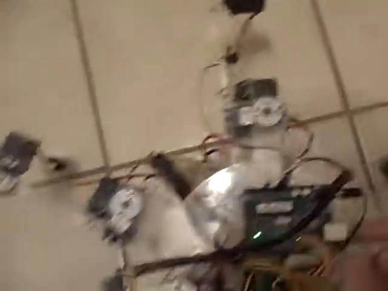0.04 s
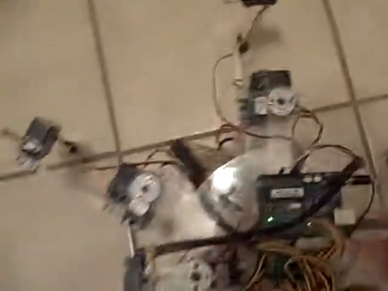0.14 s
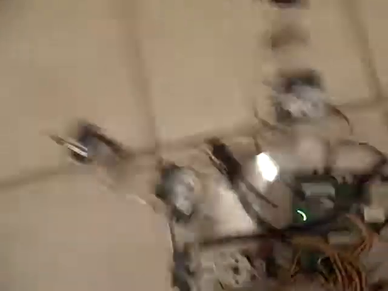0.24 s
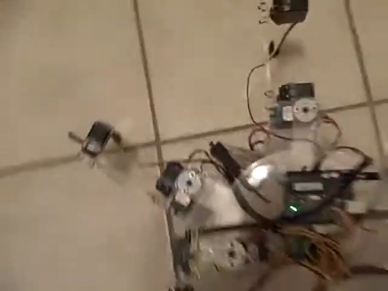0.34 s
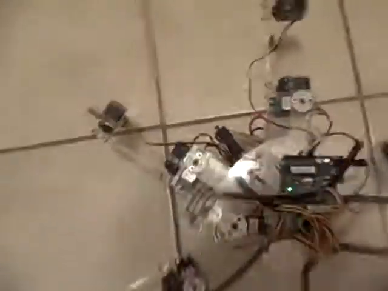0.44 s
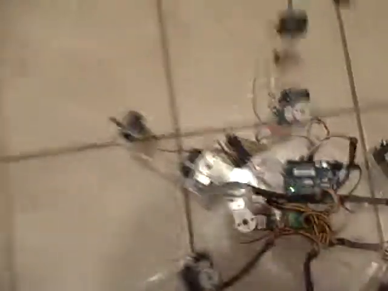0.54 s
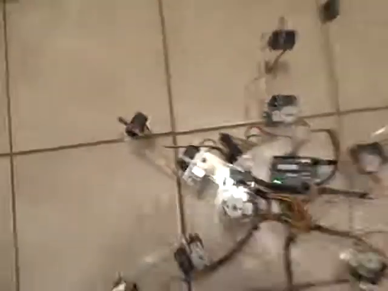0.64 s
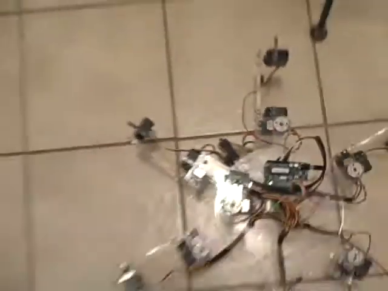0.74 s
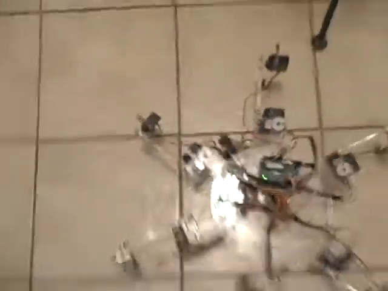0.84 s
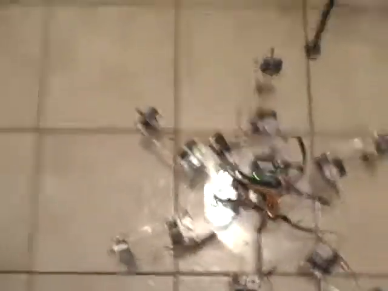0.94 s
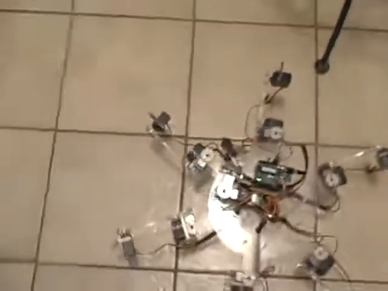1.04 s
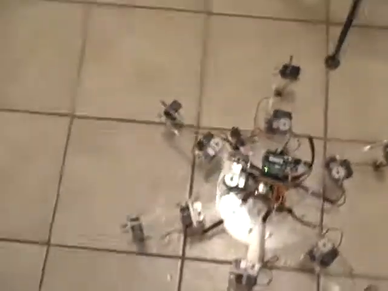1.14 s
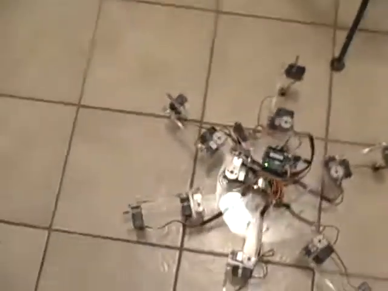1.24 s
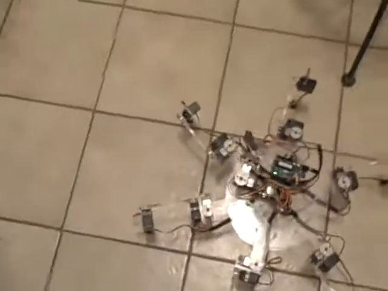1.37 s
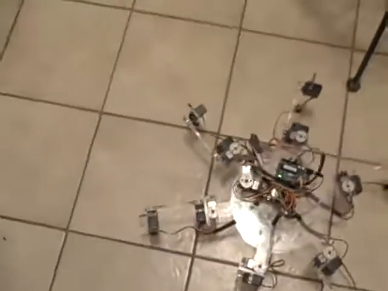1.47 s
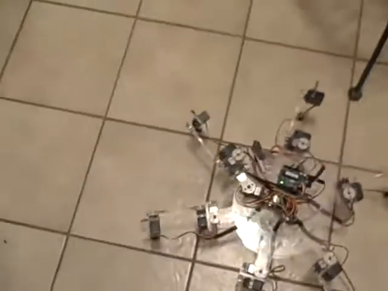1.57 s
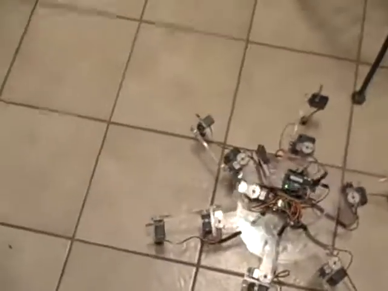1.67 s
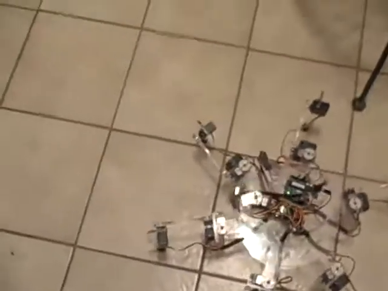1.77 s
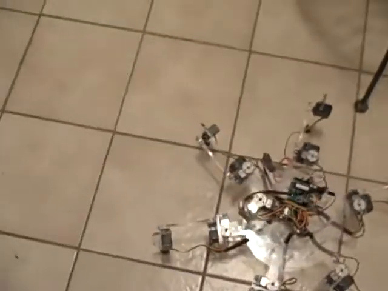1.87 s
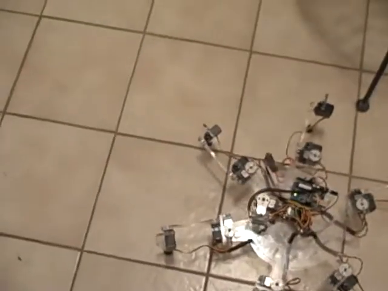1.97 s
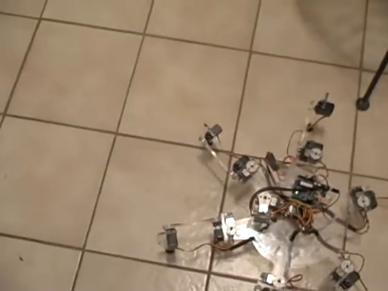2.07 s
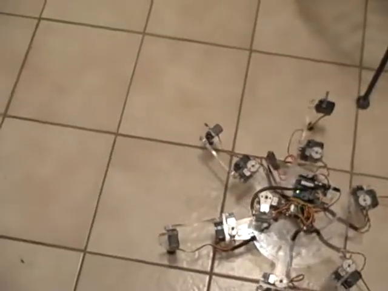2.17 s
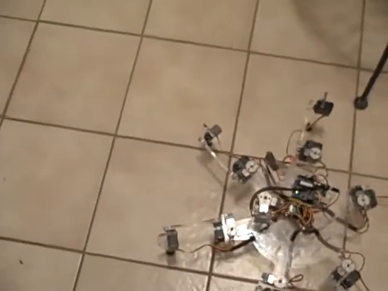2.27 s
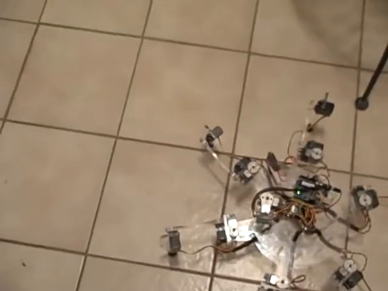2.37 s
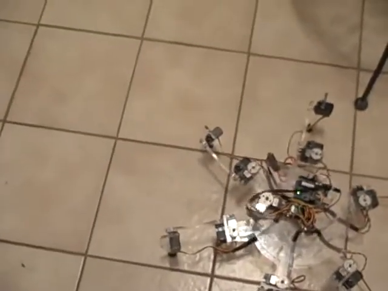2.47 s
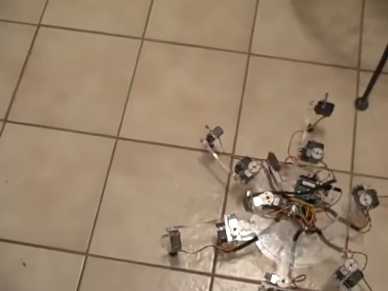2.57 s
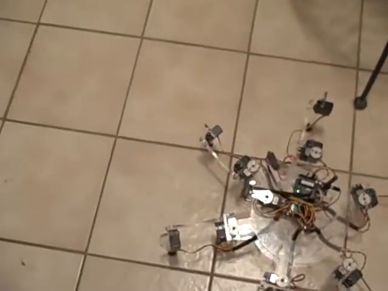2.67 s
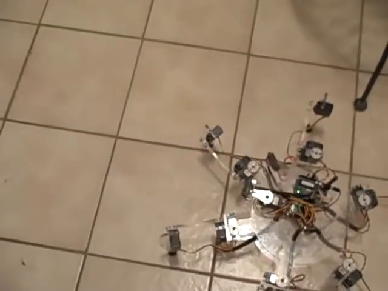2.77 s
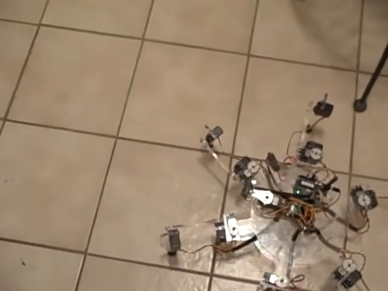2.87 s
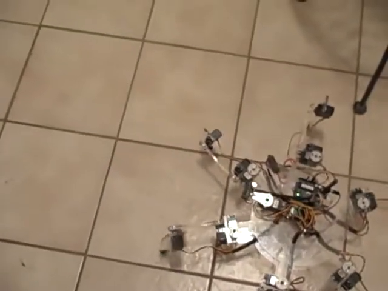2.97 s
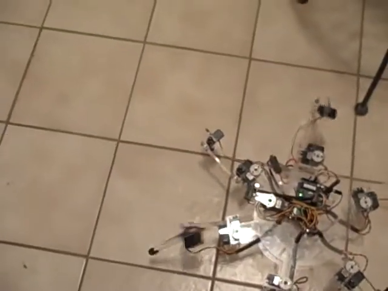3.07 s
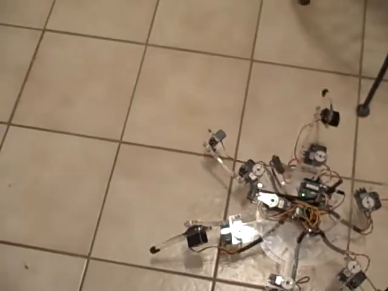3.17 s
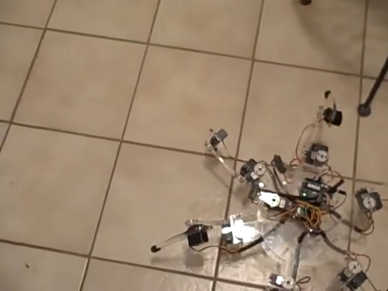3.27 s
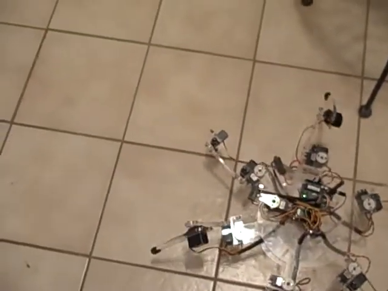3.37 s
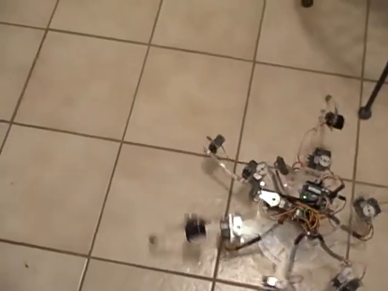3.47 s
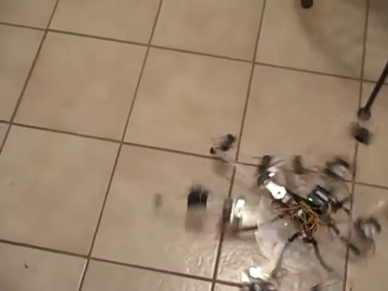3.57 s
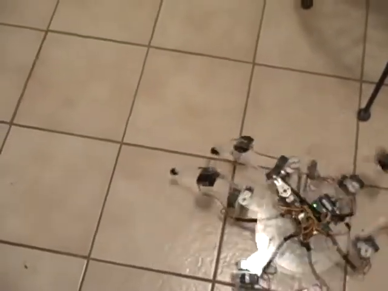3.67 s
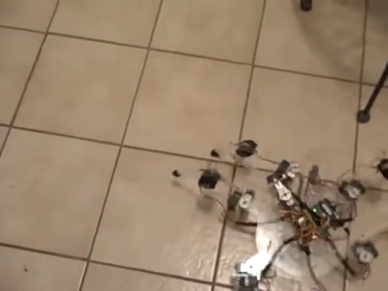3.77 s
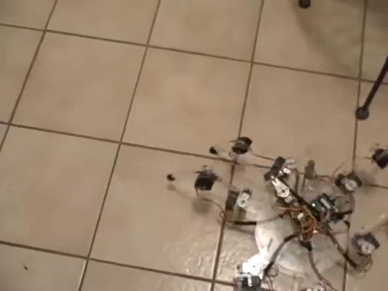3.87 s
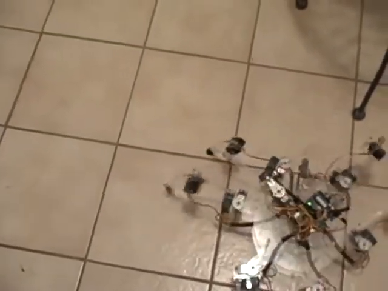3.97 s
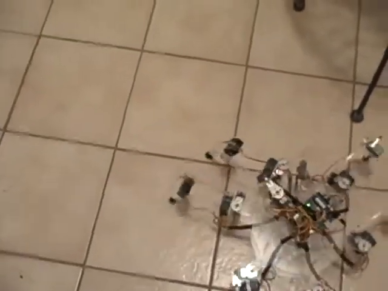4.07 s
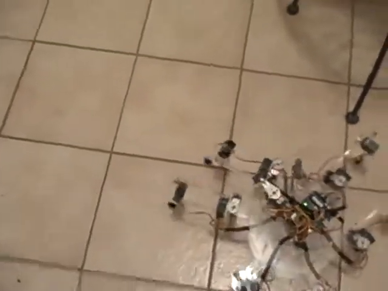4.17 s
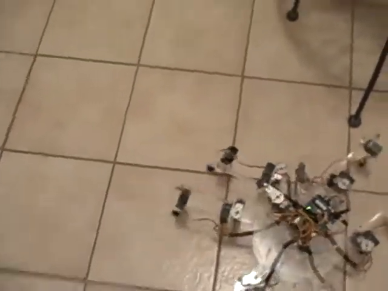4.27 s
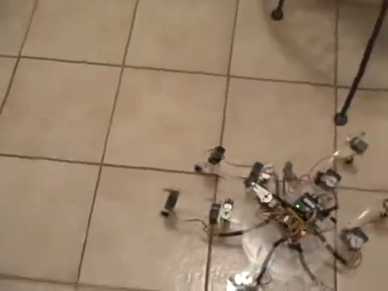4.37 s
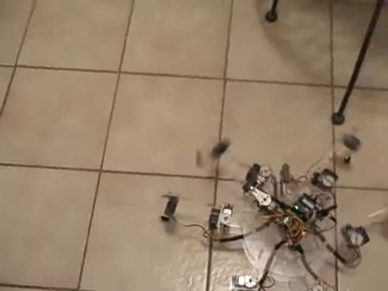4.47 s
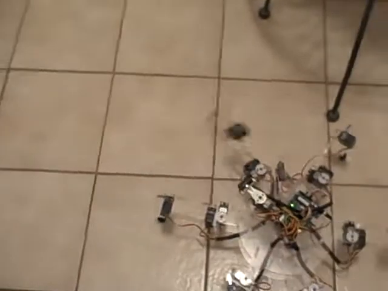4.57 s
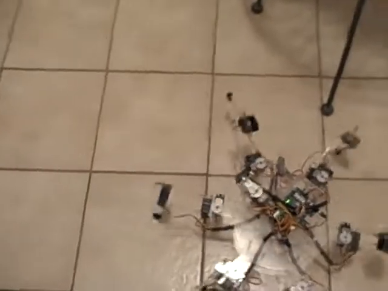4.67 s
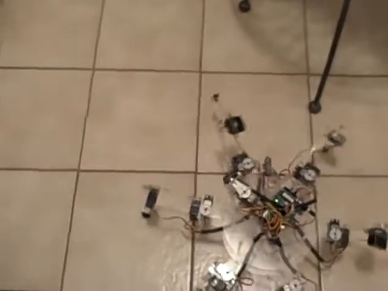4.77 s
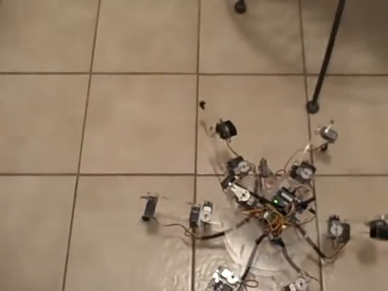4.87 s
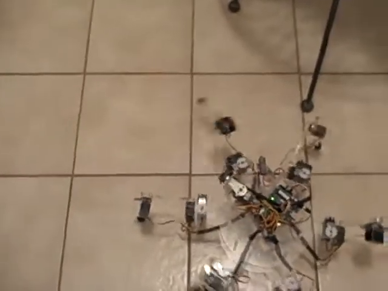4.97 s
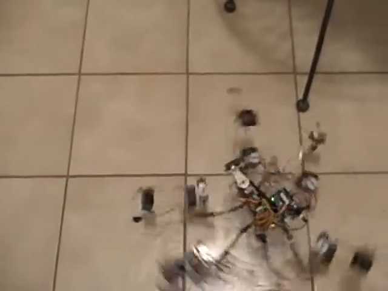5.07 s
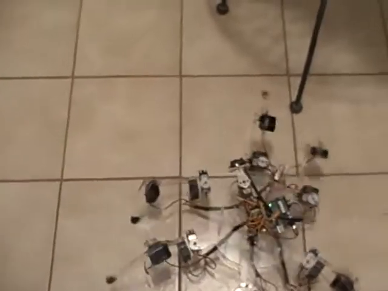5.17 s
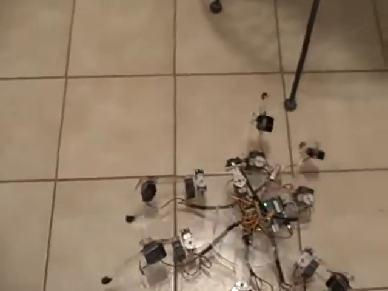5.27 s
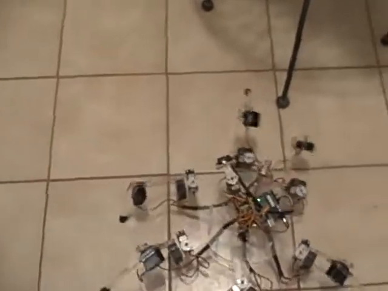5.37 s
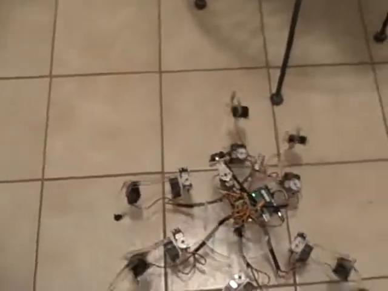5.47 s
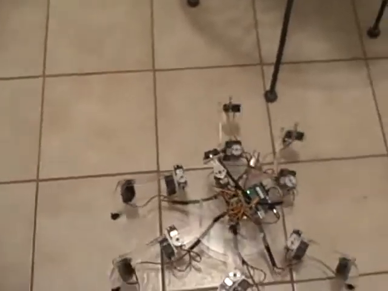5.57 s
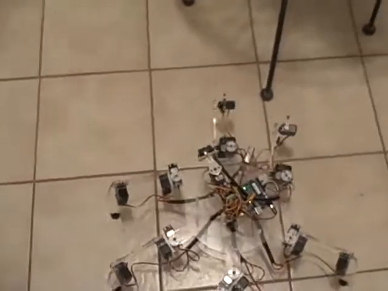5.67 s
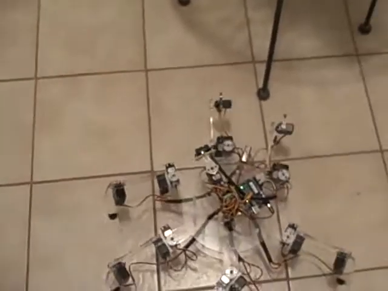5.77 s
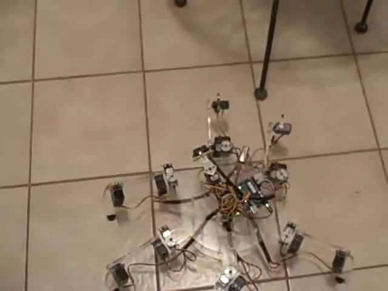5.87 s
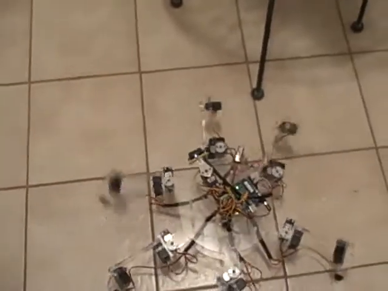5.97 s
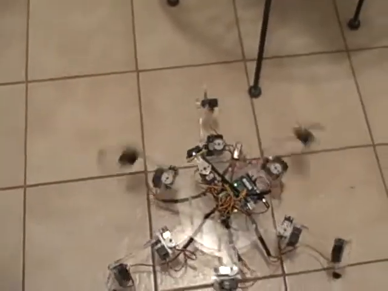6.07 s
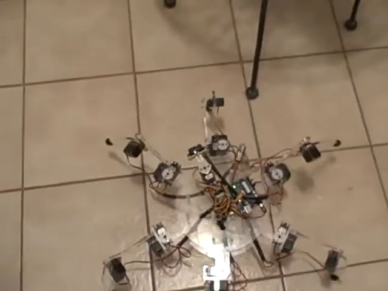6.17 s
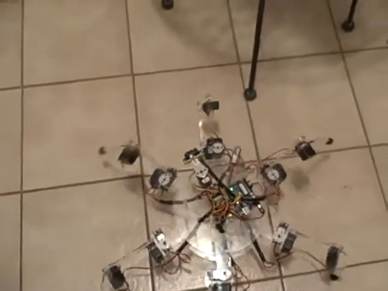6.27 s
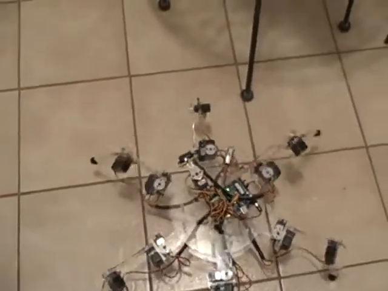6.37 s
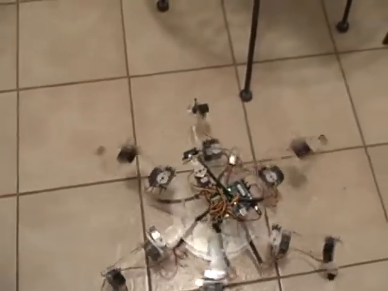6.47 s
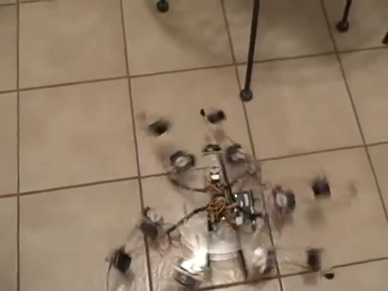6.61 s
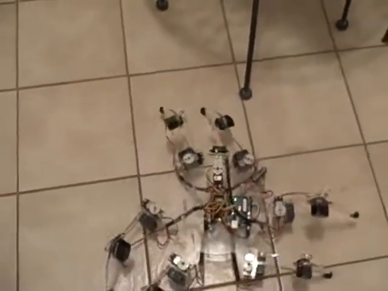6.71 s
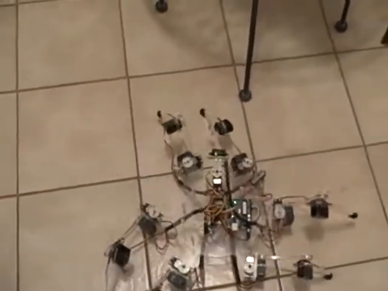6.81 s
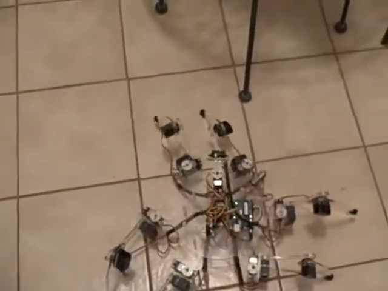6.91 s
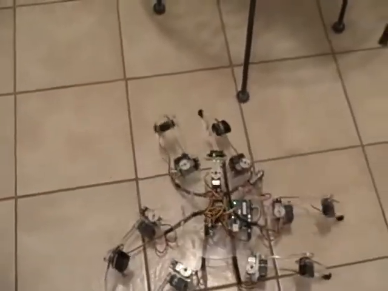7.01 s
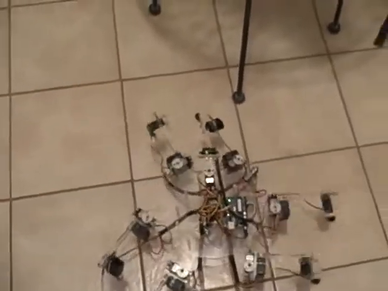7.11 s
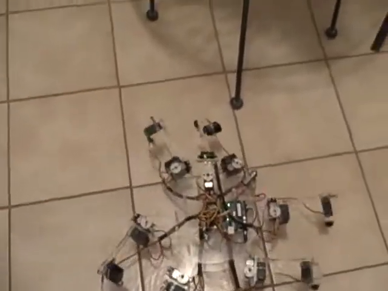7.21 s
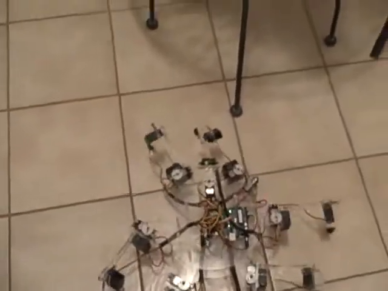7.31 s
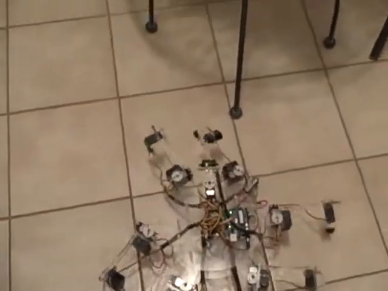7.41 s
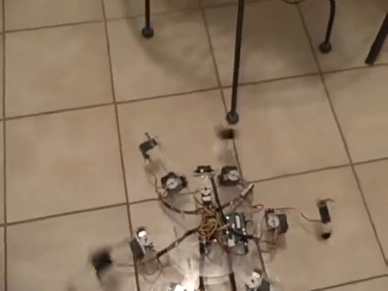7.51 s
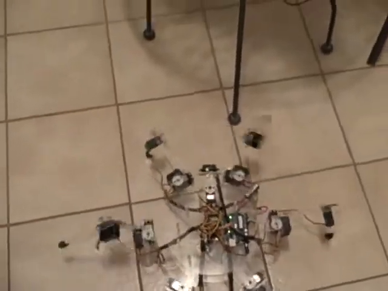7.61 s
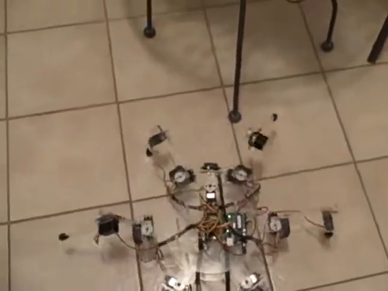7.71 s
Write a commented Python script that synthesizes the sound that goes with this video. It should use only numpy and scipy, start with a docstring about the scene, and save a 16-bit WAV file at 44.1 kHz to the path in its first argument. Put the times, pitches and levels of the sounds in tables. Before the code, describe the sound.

Small servo motors chirp and buzz under strain, a loud electrical pop hits, then a legged robot whirs in short even bursts across tiles.

```python
"""A six-legged robot on tiles

A homemade six-legged robot strains its motors, then steps across a tiled floor, whirring twice a second.
Gear trains give tooth harmonics and grind, loaded servos a commutator buzz, feet damped knocks and judder.
Small nudges rustle, servo gears chirp, and idle servos sing at harmonics of their 50 Hz control rate.
Tiles and walls reverberate over dull room noise and a late hum; once an electrical pop overloads the input."""
import sys
import numpy as np
from scipy import signal
from scipy.fft import rfft, irfft, next_fast_len
from scipy.io import wavfile
from scipy.ndimage import map_coordinates

SR = 44100
rng = np.random.default_rng(int(sys.argv[2]) if len(sys.argv) > 2 else 0)


def persist_wave(psi):
    """Save psi, clipped to +-1, as 16-bit WAV."""
    counts = np.round(np.clip(psi, -1, 1) * 32767).astype(np.int16)
    wavfile.write(sys.argv[1], SR, np.atleast_2d(counts).T)


N = 341725
TIME = np.arange(N) / SR


def from_db(db):
    """Amplitude ratio of a level: 20 dB is a factor of ten."""
    return 10 ** (np.asarray(db) / 20)


def rms_one(x):
    """Normalise the mean power: scale to rms 1."""
    return x / np.sqrt(np.mean(x ** 2) + 1e-20)


def in_time(points):
    """Linear interpolation of a level curve over the whole scene."""
    s, db = np.transpose(points)
    return np.interp(TIME, s, db)


def at_hz(points, hz):
    """Gain of a spectrum at any frequency, interpolated in dB over log frequency."""
    f, db = np.transpose(points)
    return from_db(np.interp(np.log(hz + 0.00076), np.log(f), db))


def coloured(x, spectrum):
    """Linear filtering as a product of spectra; rms 1."""
    size = next_fast_len(len(x))
    gain = at_hz(spectrum, np.arange(size // 2 + 1) * SR / size)
    return rms_one(irfft(rfft(x, size) * gain, size)[:len(x)])


def drift(rate_hz, size=N):
    """Band-limited chance: a smooth curve through normal random knots, rate_hz of them a second."""
    knots = rng.standard_normal(size // 8 + 4)[:int(size * rate_hz / SR) + 4]
    return map_coordinates(knots, [np.arange(size) * rate_hz / SR], order=2, mode="nearest")


def clicks(per_s, spread_db):
    """Shot noise: random impacts of either sign and uneven size; rms 1."""
    struck = rng.random(N) < per_s / SR
    sign = rng.choice([-1, 1], N)
    size = from_db(spread_db * np.clip(rng.standard_normal(N), -2, 2))
    return rms_one(struck * sign * size)


def each_turn(turns, size):
    """Rotational periodicity: the same uneven surface of size points passes each turn; rms 1."""
    surface = rng.standard_normal(size)
    return rms_one(map_coordinates(surface - surface.mean(), [turns % 1 * size], order=3, mode="grid-wrap"))


def stroke(age, length_s, attack_s, swell_db, release_db_per_s):
    """Envelope of one effort: a quick attack, a steady swell that reaches 0 dB at its end, a release."""
    db = swell_db * np.clip(age / length_s - 1, -1, 0) - release_db_per_s * np.maximum(age - length_s, 0)
    return np.clip(age / attack_s, 0, 1) ** 2 * from_db(db)


def background(hum_hz=107, hum_start_s=7.0, hum_rise_s=0.32, hum_level_db=-53):
    """Dull broadband room noise, and a late harmonic hum of wavering frequency."""
    # level of the room noise: time_s, level_db
    room_level = [(0, -57.5), (2.72, -56.5), (2.78, -64), (7.75, -64.5)]
    # spectrum of the room noise: frequency_hz, relative_density_db
    room_spectrum = [(15, -28), (25, 1.5), (86, 1.5), (299, -5), (352, -7), (392, -8), (1010, -12),
                     (1470, -14.5), (3880, -17), (4450, -19), (15800, -25)]
    # partials of the hum: multiple, relative_level_db
    partials = [(1, 4.5), (2, -5.5), (3, -20)]
    noise = from_db(in_time(room_level)) * coloured(rng.standard_normal(N), room_spectrum)
    phase = 2 * np.pi * np.cumsum(hum_hz * (1 + 0.00744 * drift(23))) / SR
    hum = rms_one(sum(from_db(db) * np.sin(k * phase) for k, db in partials))
    rise = np.clip((TIME - hum_start_s) / hum_rise_s, 0, 1) ** 2
    return noise + from_db(hum_level_db) * rise * hum


def idle_servos(control_hz=50.3, lines_db=-2, fizz_db=-8, main_db=-3, restless_db=5, walk_s=2.7):
    """A pulse train's line spectrum in one narrow band; walking weakens the lines and raises a fizz."""
    # common gain of lines and fizz: time_s, level_db
    idle_level = [(0, -50.5), (.7, -60), (2.7, -64.5), (2.8, -60), (4.2, -60), (7.75, -56)]
    # weights of the control-rate lines: frequency_hz, relative_level_db
    line_spectrum = [(1000, -25), (1120, -6), (1300, -9), (1480, -4), (1720, -9.5), (1810, -17),
                     (1950, -17.5)]
    # spectrum of the fizz: frequency_hz, relative_density_db
    fizz_spectrum = [(950, -27.5), (1150, -3.5), (1550, 1), (1750, -4), (2000, -20.5), (3300, -16.5),
                     (6500, -12.5), (7600, -24.5), (16000, -24.5)]
    phase = 2 * np.pi * control_hz * TIME
    comb = 0
    for k in range(20, 39):
        comb = comb + at_hz(line_spectrum, k * control_hz) * np.sin(k * phase + 2 * np.pi * rng.random())
    strongest = np.sin(29 * phase)
    # 1 while walking, fading over a second at each edge of the pause between
    walking = np.clip(TIME - walk_s, 0, 1) + np.clip(1 - TIME, 0, 1)
    lines = from_db(lines_db - restless_db * walking) * (rms_one(comb) + from_db(main_db) * strongest)
    fizz = from_db(fizz_db + restless_db * walking) * coloured(rng.standard_normal(N), fizz_spectrum)
    return from_db(in_time(idle_level)) * (lines + fizz)


def pop(leak_s=.00155):
    """Capacitor discharge: voltage surges leak away through the input's coupling capacitor."""
    # surges before the leak: start_s, size_re_full_scale, rise_s (time constant)
    surges = [(2.7369, .66, .00002), (2.7427, 23, .004), (2.74715, -98, .0036)]
    out = 0
    for s, size, rise_s in surges:
        age = np.clip(TIME - s, 0, .5)
        out = out + size * (1 - np.exp(-age / rise_s)) * np.exp(-age / leak_s)
    return out


def gear_chirps(waver_rad=1.0):
    """Phase-modulated tones under bell envelopes: brief chirps and a few longer whines of the servo gears."""
    # short notes: centre_s, peak_db, pitch_hz, half_length_s (to 1/e)
    notes = [(0.053, -43.5, 6000, 0.011), (0.105, -42, 1150, 0.014), (0.277, -34.5, 5126, 0.0114),
             (0.309, -39.5, 1164, 0.011), (3.017, -40, 4900, 0.0102), (3.073, -42, 5360, 0.0062),
             (3.104, -50, 3714, 0.065), (3.147, -47.5, 1160, 0.017), (5.086, -39.5, 3985, 0.066),
             (5.489, -48.5, 3450, 0.0071), (5.511, -54, 3170, 0.013), (5.537, -41.5, 1776, 0.0091)]
    unsteady = waver_rad * drift(250)
    out = np.zeros(N)
    for s, db, hz, half_s in notes:
        bell = np.exp(-np.minimum(((TIME - s) / half_s) ** 2, 50))
        out += from_db(db) * bell * np.sin(2 * np.pi * hz * TIME + unsteady)
    return out


def twitches():
    """High-passed noise under exponential decay: a motor nudges its gears with a brief bright rustle."""
    # nudges: start_s, initial_db, fade_s (time constant), lowest_hz
    nudges = [(.165, -53.5, 0.15, 3000), (.39, -42.5, 0.058, 3000), (1.084, -52.5, .04, 8800),
              (1.18, -57, 0.028, 8800), (2.958, -47, 0.013, 4000), (3.942, -50, 0.013, 2500),
              (4.867, -59, .025, 8070), (5.41, -58, 0.03, 8000), (6.368, -59, 0.0241, 4000),
              (6.822, -44.5, 0.0296, 2980)]
    out = np.zeros(N)
    grit = rng.standard_normal(N) + clicks(per_s=410, spread_db=7)
    for s, db, fade_s, low_hz in nudges:
        highpass = signal.butter(4, low_hz, "high", fs=SR, output="sos")
        rustle = rms_one(signal.sosfilt(highpass, grit))
        out += from_db(db) * rustle * (TIME >= s) * np.exp(-np.abs(TIME - s) / fade_s)
    return out


def skidding():
    """Envelope of stick-slip judder as a foot slides, bites and lets go."""
    # skids over the tiles: start_s, time_to_peak_s, relative_peak_db, fade_db_per_s
    skids = [(0.246, 0.02, -51.5, 320), (4.051, 0.069, -49, 187), (5.571, 0.051, -49, 190),
             (7.034, 0.038, -50, 98)]
    return sum(from_db(db) * stroke(TIME - s, rise_s, attack_s=.012, swell_db=2.5, release_db_per_s=fade)
               for s, rise_s, db, fade in skids)


def feet(skid_db=4.5, tap_t60_s=0.014):
    """Stick-slip impacts drive the frame's resonances; a clean landing is one damped oscillation."""
    # ring of the frame: frequency_hz, relative_density_db
    frame_spectrum = [(90, -27), (150, 7), (210, -2.5), (290, 0.5), (450, -1.5), (740, -3.5), (960, -9.5),
                      (1200, -2.5), (1930, -2.5), (2500, -20), (4000, -50)]
    # foot taps: start_s, initial_db, ring_hz
    taps = [(0.786, -40.5, 560), (0.925, -41, 1150), (2.972, -32.5, 1610), (4.059, -39.5, 596),
            (4.507, -35.5, 758), (4.846, -41.5, 843), (5.619, -40, 501), (5.977, -33.5, 1440),
            (6.507, -43, 934), (7.02, -40, 870), (7.043, -31.5, 1730), (7.069, -25.5, 633)]
    out = from_db(skid_db) * skidding() * coloured(clicks(per_s=540, spread_db=1.5), frame_spectrum)
    for s, db, hz in taps:
        age = np.maximum(TIME - s, 0)
        decay_db = 60 * np.minimum(age / tap_t60_s, 10)
        out += from_db(db - decay_db) * np.sin(2 * np.pi * hz * age)
    return out


def strain_effort(pickup_share=.11, pickup_s=.06, slowing_share=.03, slowing_s=.07):
    """First-order lag: load and speed (turns per s) of a motor that picks up, then slows near its goal."""
    # a motor straining under load: start_s, length_s, final_load_db, swell_db, speed_turns_per_s (before losses)
    strains = [(.385, .32, -44, -0.5, 236), (1.425, .605, -49.5, 4, 229), (2.44, .29, -49, 4.5, 226)]
    load, speed = np.zeros(N), np.zeros(N)
    for start_s, length_s, db, swell_db, turns_per_s in strains:
        age = np.maximum(TIME - start_s, 0)
        load += from_db(db) * stroke(age, length_s, attack_s=.026, swell_db=swell_db, release_db_per_s=328)
        lost_at_first = pickup_share * np.exp(-age / pickup_s)
        lost_at_end = slowing_share * np.exp(np.minimum(age - length_s, 0) / slowing_s)
        speed = np.where(age > 0, turns_per_s * (1 - lost_at_first - lost_at_end), speed)
    return load, speed


def straining(buzz_db=-1.5, squeal_db=-3, squeal_hz=4690, squeal_width_hz=130, throb_hz=38, throb=.24,
              rub=0.46, hiss=1.35, unsteady=0.008):
    """Commutation noise: brushes cross three bars a turn; the loaded motor throbs as it hunts and squeals."""
    # spectrum of the buzz: frequency_hz, relative_density_db
    buzz_spectrum = [(1000, -7.5), (2300, -2), (3200, -5), (4000, -1), (4550, 8), (5200, -1.5), (6000, 5.5),
                     (6600, -1), (8800, -3.5), (11300, 1.5), (13300, -2), (14700, 1), (16000, -7.5)]
    load, speed = strain_effort()
    turns = np.cumsum(speed * (1 + unsteady * drift(200))) / SR
    bars = 3 * turns
    # differentiation makes the brush clicks sharpest in the treble
    brushes = rms_one(np.diff(each_turn(bars, size=56), prepend=0))
    friction = rub * each_turn(turns, size=170) + hiss * rng.standard_normal(N)
    buzz = coloured(brushes + friction, buzz_spectrum)
    # under heavy load the twentieth order squeals as it nears a resonance
    nearness = 1 / (1 + ((20 * speed - squeal_hz) / squeal_width_hz) ** 2)
    twentieth = rms_one(np.sin(2 * np.pi * 20 * turns + 1.4 * drift(250)))
    squeal = from_db(squeal_db) * nearness * load / load.max() * twentieth
    hunting = 1 + throb * np.sin(2 * np.pi * throb_hz * TIME)
    return from_db(buzz_db) * load * (buzz + squeal) * hunting


def motor_speed(age, start_share, spin_up_s, ease_after_s, ease_per_s):
    """First-order spin-up towards full speed, then a linear easing as the leg nears its goal."""
    return 1 - (1 - start_share) * np.exp(-age / spin_up_s) - ease_per_s * np.maximum(age - ease_after_s, 0)


def braking(past_stop_s, surge_db, early_s=0.02, lead_s=0.024, half_s=.03):
    """Two overlapping bells in dB: a coasting motor's sag, then its braking surge just before drive ends."""
    t = past_stop_s + early_s
    surge = np.exp(-(t / half_s) ** 2)
    sag = np.exp(-((t + lead_s) / half_s) ** 2)
    return from_db(surge_db * (surge - sag))


def gear_train(mesh_hz, wander=0.00907, load_sway=.03, jitter_rad=0.23, wobble=0.22, flutter_db=3,
               shimmer_db=4, teeth=9):
    """Gear meshing: tooth harmonics, their fundamental, and the grind of worn pinions running out of true."""
    # servos that move together: speed_ratio, relative_level_db
    servos = [(1, 2.5), (.92, -0.5), (1.07, -5), (.83, -6)]
    # resonance of the gear case: frequency_hz, relative_level_db
    case_spectrum = [(1200, -20), (2600, -11.5), (3800, -10), (4500, -4.5), (5400, 4.5), (6300, -0.5),
                     (7200, -14.5), (10000, -13.5), (16000, -38)]
    size, whine, fundamental, grind = len(mesh_hz), 0, 0, 0
    for ratio, db in servos:
        hz = mesh_hz * ratio * (1 + wander * drift(59.9, size) + load_sway * drift(22, size))
        phase = 2 * np.pi * np.cumsum(hz) / SR + jitter_rad * drift(700, size)
        rotor = phase / teeth + 2 * np.pi * rng.random()
        force = from_db(db) * (1 + wobble * np.sin(rotor)) * from_db(flutter_db * drift(215.2, size))
        fundamental = fundamental + force * np.sin(phase)
        grind = grind + force * each_turn(rotor / (2 * np.pi), size=200)
        for k in range(2, 9):
            # a harmonic swells in the resonance of the case, and shimmers as the tooth contact shifts
            strength = at_hz(case_spectrum, k * hz) * from_db(shimmer_db * drift(70.8, size))
            whine = whine + force * strength * np.sin(k * phase + 2 * np.pi * rng.random())
    return rms_one(whine), rms_one(fundamental), rms_one(grind)


def leg_moves(rows, speed_law, attack_s, release_db_per_s, whine_swell_db, rasp_swell_db, fundamental_re_rasp_db,
              fundamental_swell_db, brake_db=0, scrape=0.61, backlash=1.0):
    """Mesh excitation grows with speed: gear trains whine; teeth grind, scrape and rattle in their play."""
    # spectrum of the rasp through the gearbox: frequency_hz, relative_density_db
    rasp_spectrum = [(300, -13.5), (1000, -14), (2000, -7.5), (2700, -4), (3800, 4), (5600, -3), (6400, 0),
                     (7200, 1.5), (8500, -1), (11500, 0.5), (15500, -1.5)]
    # whine and rasp grow as these powers of speed; the gears run on after the drive stops
    whine_power, rasp_power, run_on_s = 0.82, 2, 0.094
    rattle = scrape * rng.standard_normal(N) + backlash * clicks(per_s=700, spread_db=6.5)
    out = np.zeros(N)
    for start_s, driven_s, whine_db, rasp_db, full_hz in rows:
        on = (TIME >= start_s) & (TIME < start_s + driven_s + run_on_s)
        age = TIME[on] - start_s
        speed = np.maximum(motor_speed(age, **speed_law), .1)
        whine, fundamental, grind = gear_train(full_hz * speed)
        rasp = speed ** rasp_power * coloured(grind + rattle[on], rasp_spectrum)
        layers = [(speed ** whine_power * whine, whine_db, whine_swell_db),
                  (rasp, rasp_db, rasp_swell_db),
                  (fundamental, rasp_db + fundamental_re_rasp_db, fundamental_swell_db)]
        gears = sum(x * from_db(db) * stroke(age, driven_s, attack_s, swell_db, release_db_per_s)
                    for x, db, swell_db in layers)
        out[on] += gears * braking(age - driven_s, brake_db)
    return out


# once the robot walks, the gait cycles through shove, short swing and long swing, half a second apart
def shoves():
    """Slowly building load: legs push the body along, so the gears swell to a peak and drop away."""
    # shoves: start_s, driven_s, whine_db and rasp_db (at full speed), full_speed_teeth_per_s
    shove_rows = [(0.005, 0.044, -47, -42.5, 2300), (0.225, 0.036, -46, -37.5, 2050),
                  (2.975, .12, -56, -40, 1830), (3.98, 0.13, -43, -42.5, 2040),
                  (5.46, 0.15, -43, -40, 2050), (6.975, 0.12, -45, -44, 1950)]
    speed_law = dict(start_share=.72, spin_up_s=.06, ease_after_s=.12, ease_per_s=1.8)
    return leg_moves(shove_rows, speed_law, attack_s=0.0079, release_db_per_s=224, whine_swell_db=28,
                     rasp_swell_db=11, fundamental_re_rasp_db=-12, fundamental_swell_db=8.5)


def short_swings():
    """Early deceleration: the whine leaps up, sinks again and ends in a surge of braking."""
    # short swings: start_s, driven_s, whine_db and rasp_db (at full speed), full_speed_teeth_per_s
    short_rows = [(4.454, 0.17, -39.5, -35.5, 1920), (5.952, 0.15, -39, -35.5, 1820),
                  (7.447, 0.17, -39, -35.5, 1900)]
    speed_law = dict(start_share=.62, spin_up_s=.024, ease_after_s=.06, ease_per_s=1.5)
    return leg_moves(short_rows, speed_law, attack_s=0.023, release_db_per_s=234, whine_swell_db=-3.5,
                     rasp_swell_db=6, fundamental_re_rasp_db=-15, fundamental_swell_db=10, brake_db=4.0)


def long_swings():
    """Pitch follows motor speed: a clear whine rises while driven and turns raspy towards full speed."""
    # long swings: start_s, driven_s, whine_db and rasp_db (at full speed), full_speed_teeth_per_s
    long_rows = [(3.455, 0.19, -34.5, -35.5, 2350), (4.953, 0.19, -36.5, -37.5, 2220),
                 (6.452, 0.19, -35.5, -36.5, 2140)]
    speed_law = dict(start_share=.61, spin_up_s=.07, ease_after_s=0.23, ease_per_s=.6)
    return leg_moves(long_rows, speed_law, attack_s=0.028, release_db_per_s=267, whine_swell_db=-3,
                     rasp_swell_db=7.5, fundamental_re_rasp_db=-17.5, fundamental_swell_db=27)


def tiled_room(x, wet_db=-5, split_hz=7000, t60_s=0.52, treble_t60_s=.24):
    """Diffuse reverberation: dense reflections off tiles and walls; the treble dies sooner."""
    age = TIME[:SR * 3 // 4]
    scatter = rng.standard_normal(len(age)) * (age > .004)
    dull = signal.sosfilt(signal.butter(2, split_hz, fs=SR, output="sos"), scatter)
    bright = signal.sosfilt(signal.butter(2, split_hz, "high", fs=SR, output="sos"), scatter)
    tail = dull * from_db(-60 * age / t60_s) - bright * from_db(-60 * age / treble_t60_s)
    wet = signal.fftconvolve(x, tail / np.sqrt(np.sum(tail ** 2)))[:N]
    # keep the summed power of direct and reverberant sound
    return (x + from_db(wet_db) * wet) / np.sqrt(1 + from_db(2 * wet_db))


def gain_control(x, cut_db=8, recover_db_per_s=9.0, overload=.69, lag_s=.022):
    """Level-dependent gain: an overload turns the input down a moment later; it then creeps back up."""
    cut = cut_db * (np.interp(TIME - lag_s, TIME, np.abs(x)) > overload)
    recovered = recover_db_per_s * TIME
    held = np.maximum.accumulate(cut + recovered) - recovered
    return x * from_db(-held)


def scene():
    """Superposition: the robot in its room, its idle servos, the background, and the pop on the line."""
    walking_gears = shoves() + short_swings() + long_swings()
    robot = tiled_room(walking_gears + straining() + twitches() + gear_chirps() + feet())
    return (robot + idle_servos() + background() + pop())[None]


def record(dry, limit=.69, drain_hz=2, cutoff_hz=15900):
    """Clipping and band limits: gain drops after overload, peaks clip, offset drains away, the top is cut."""
    clipped = np.clip(gain_control(dry[0])[None], -limit, limit)
    centred = signal.lfilter(*signal.butter(1, drain_hz, "high", fs=SR), clipped)
    return signal.fftconvolve(centred, signal.firwin(255, cutoff_hz, fs=SR)[None], "same")


dry = scene()
out = record(dry)
persist_wave(out)
```